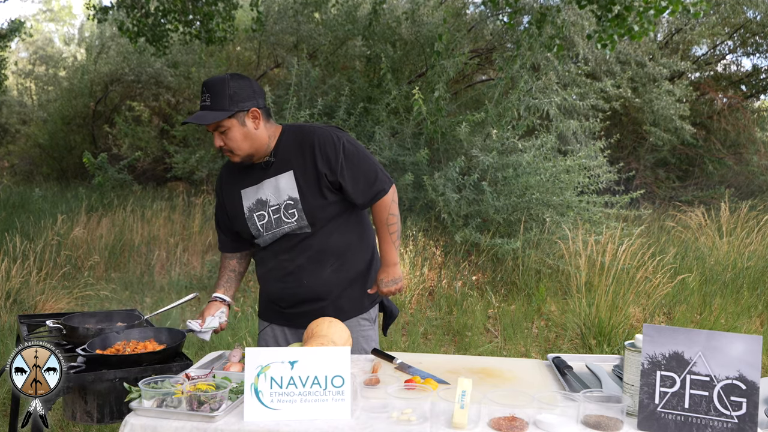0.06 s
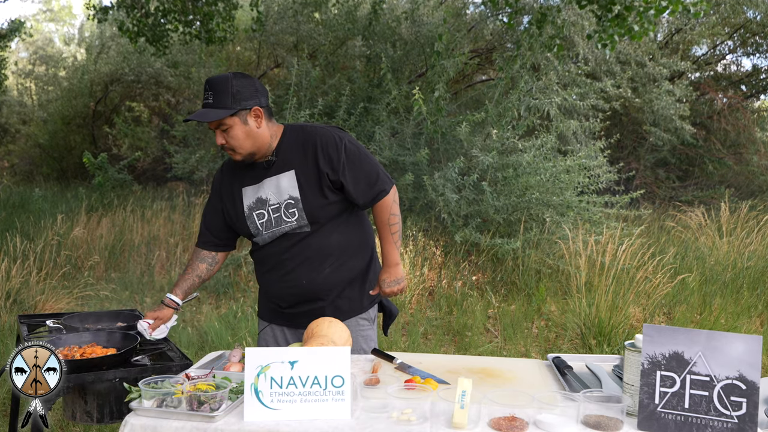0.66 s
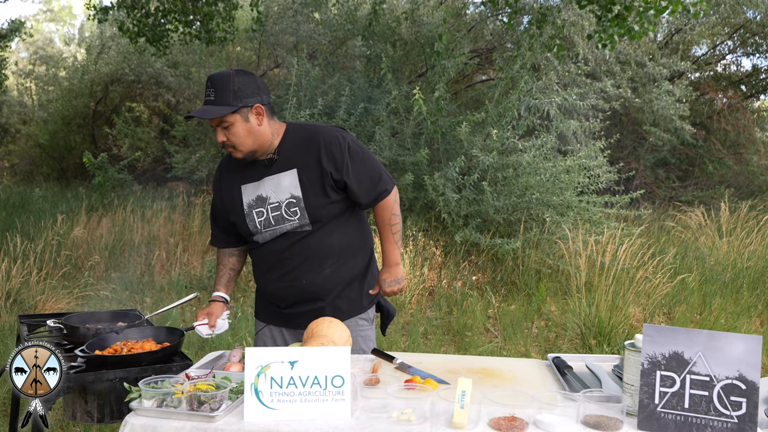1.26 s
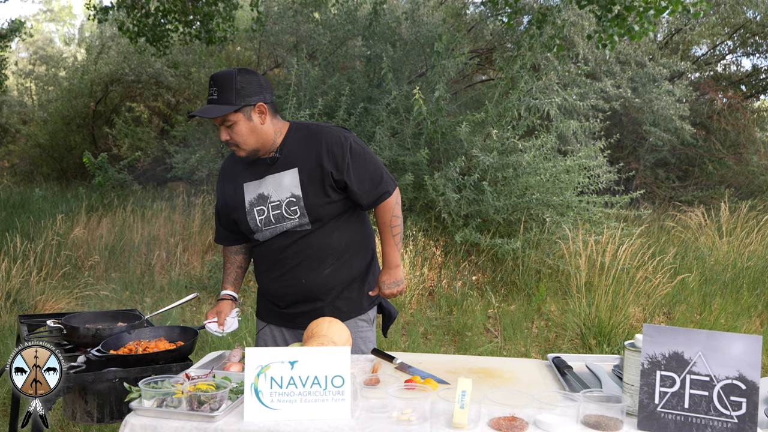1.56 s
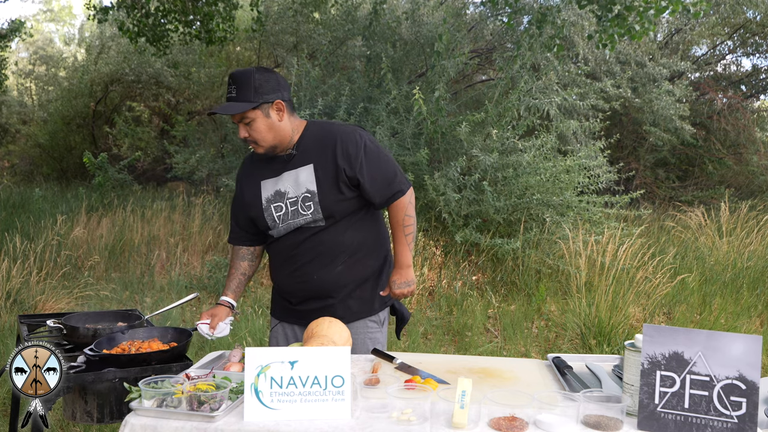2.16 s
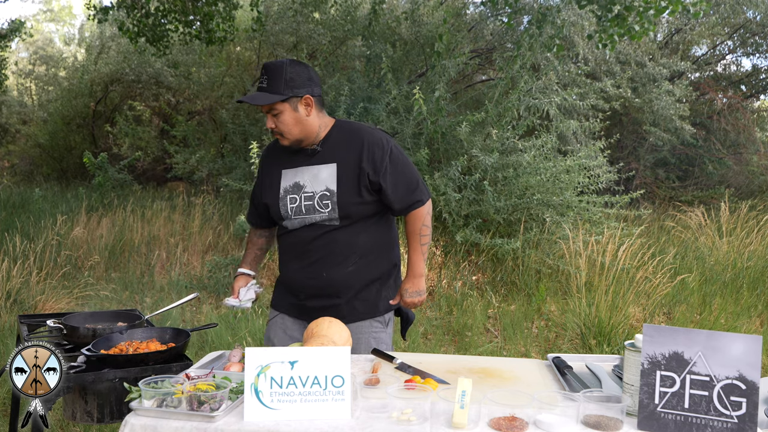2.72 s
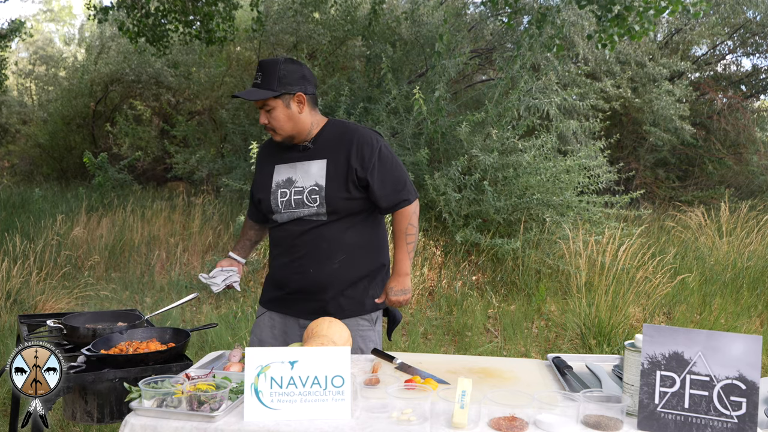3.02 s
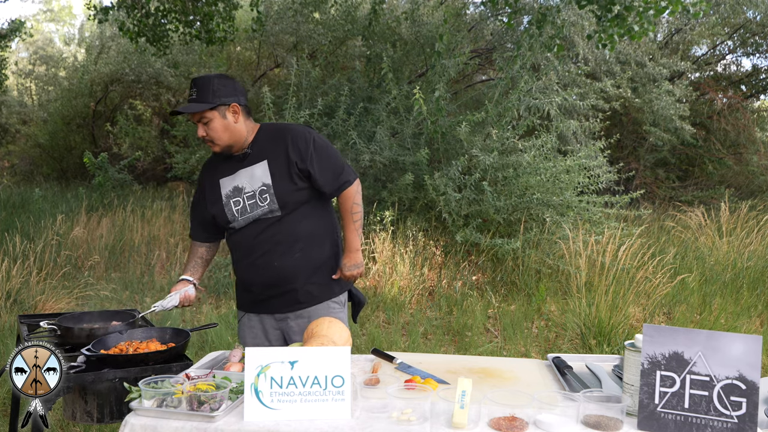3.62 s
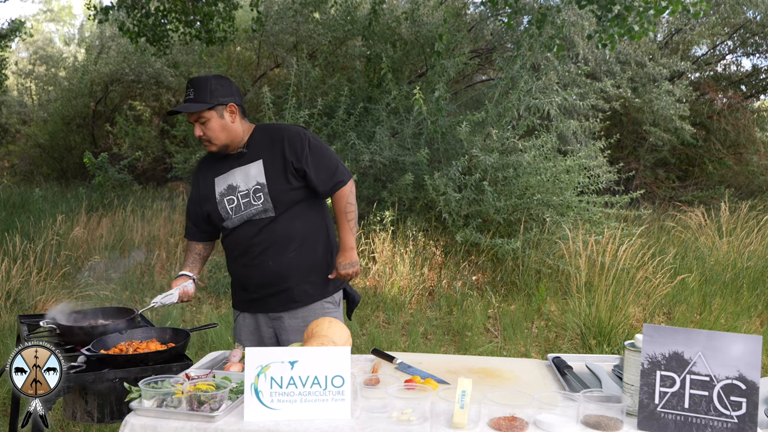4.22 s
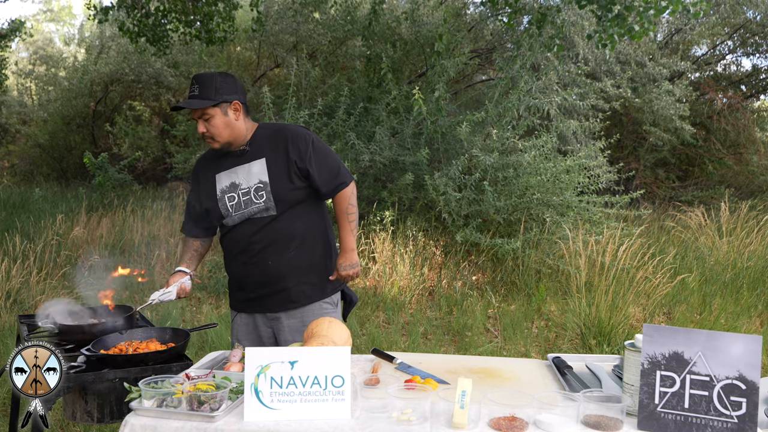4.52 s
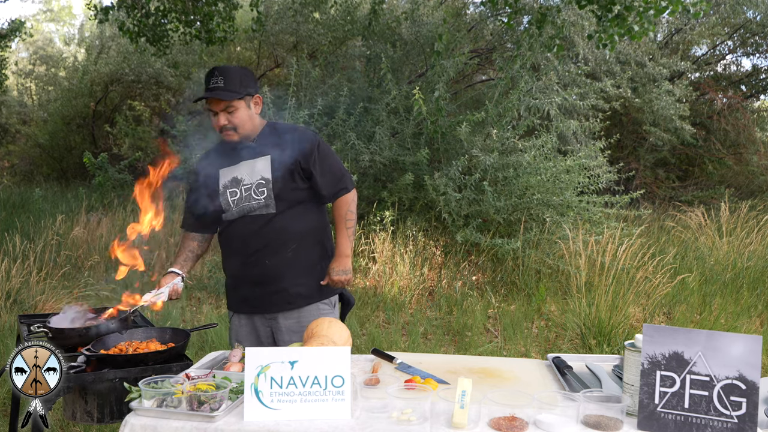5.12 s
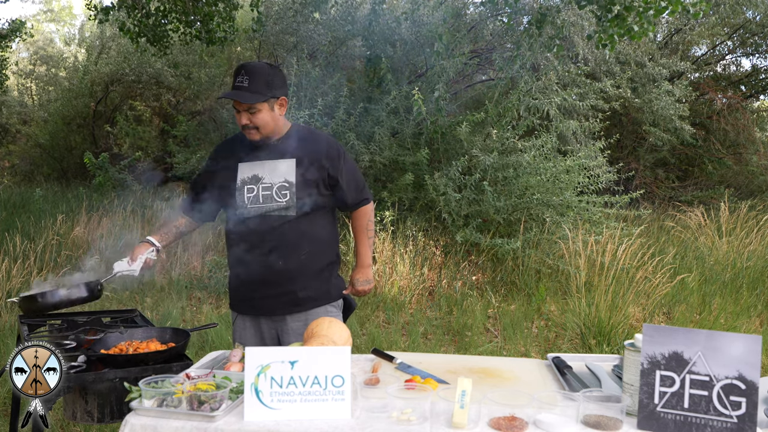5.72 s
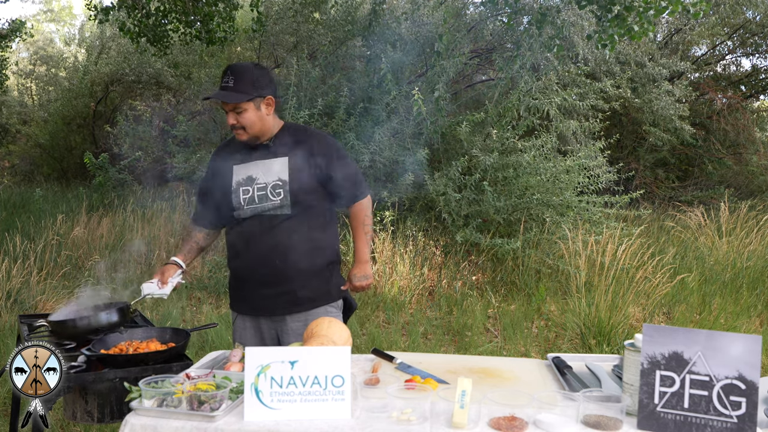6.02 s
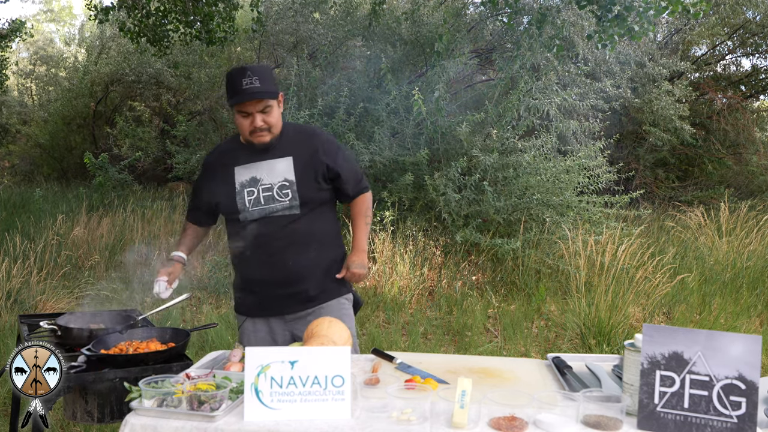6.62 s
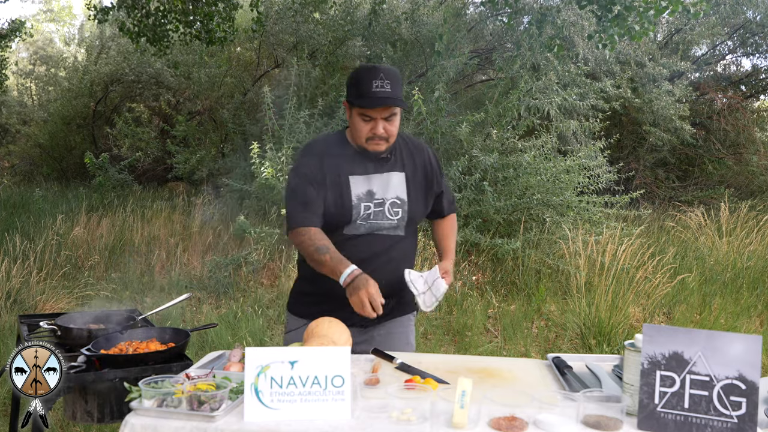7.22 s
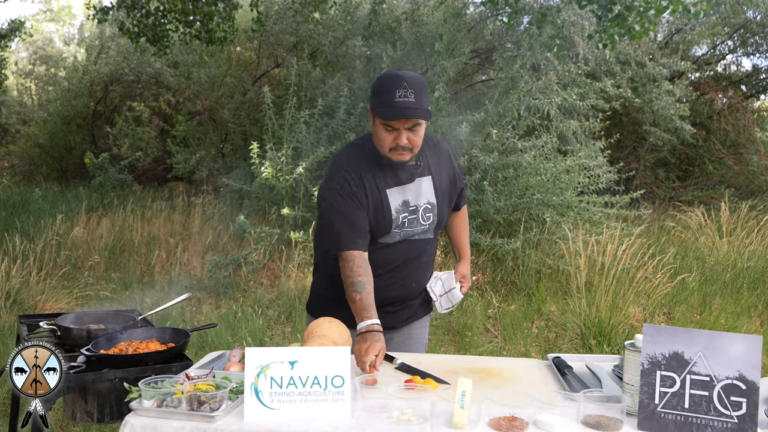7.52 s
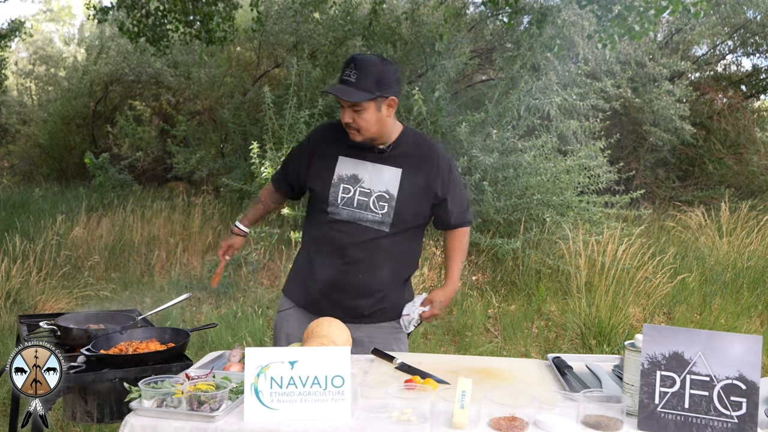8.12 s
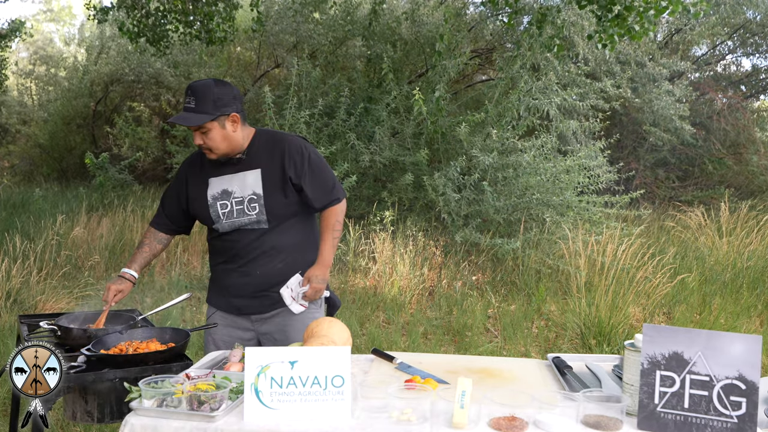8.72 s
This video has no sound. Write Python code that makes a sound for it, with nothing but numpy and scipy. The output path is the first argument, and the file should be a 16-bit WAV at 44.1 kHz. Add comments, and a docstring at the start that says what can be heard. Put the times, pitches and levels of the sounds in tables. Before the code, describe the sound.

Close, crackling frying runs over a faint rush of burners and open air. First a heavy skillet is shoved across a stove grate, ending in a bright clank. Midway another pan rattles and scrapes, the hiss swells and a low flare of fire flutters. After the pan knocks back down, the sizzling fades for a moment and returns as a wooden spoon taps the skillet once.

```python
"""Frying on a camp stove

Countless bursting bubbles make food sizzle in two pans, heard outdoors at the cook's chest. The sizzle
swells as food slides onto hot metal and sinks when the cook turns away. A cast-iron skillet is shoved
over the grate; a second pan is shaken, flares up and is set down. Each impact rings the metal's modes."""
import sys
import numpy as np
from scipy import signal
from scipy.fft import rfft, irfft
from scipy.io import wavfile
from scipy.ndimage import map_coordinates

SR = 44100
rng = np.random.default_rng(int(sys.argv[2]) if len(sys.argv) > 2 else 0)


def file_out(sig):
    """Save sig as 16-bit WAV at sys.argv[1]."""
    # one column per channel
    cols = np.atleast_2d(sig).T
    # limit, then scale
    lim = np.clip(cols, -1, 1)
    pcm = np.round(lim * 32767).astype(np.int16)
    wavfile.write(sys.argv[1], SR, pcm)


N = 386316
T = np.arange(N) / SR

# modes of the second pan: f/Hz, relative level/dB, t60/s
PAN_MODES = [(389.3, -8, 0.28), (440, -17, .08), (584, -4, 0.089), (649, -1.5, 0.057), (740, -8, 0.14),
             (882, -1.5, 0.071), (1054, -2, 0.1), (1178, 0.5, 0.11), (1432, 3.5, 0.075), (1520, -21, .1),
             (2207, -1.5, 0.11), (2200, -11, .08), (2800, -21, 0.083), (3620, 0, 0.064)]


def sizzle():
    """Three sizes of bubble sputter together; interference with a shifting echo comb-filters them."""
    # spectra of fizz, finest spray and coarse wet frying: f/Hz, relative level/dB
    fizz_shape = [(1200, -31.5), (2500, -11.5), (3600, -3.5), (5000, 1), (7000, 1.5), (9000, 0),
                  (11500, -10), (16000, -23)]
    spray_shape = [(5000, -23), (8000, -2.5), (10500, 3), (13000, 1.5), (16000, -4)]
    wet_shape = [(60, -30), (250, -16.5), (480, -13), (680, -7), (1100, -3), (1700, 1), (2300, 2.5),
                 (3200, 3), (4500, 2.5), (8000, -15)]
    fizz_db, spray_db, wet_db = frying_levels()
    sputter_db = 0.29 * walk(11) + 0.69 * walk(45) + 0.45 * walk(260)
    fizz = colour(bursts(per_s=5000, spread_db=3.5, steam_db=0), fizz_shape)
    fizz *= undb(fizz_db - 0.14 + 0.5 * walk(90))
    spray = colour(bursts(per_s=9000, spread_db=4, steam_db=0), spray_shape)
    spray *= undb(spray_db + 0.5 * walk(110))
    wet = colour(bursts(per_s=4000, spread_db=3, steam_db=-2.5), wet_shape) * undb(wet_db)
    direct = (fizz + spray + wet) * undb(sputter_db)
    lag_s = 0.001485 + 0.000306 * walk(1.2)  # the path via a nearby surface varies as the cook moves
    echo = map_coordinates(direct, [(T - lag_s) * SR], order=3)
    return direct + undb(-13) * signal.lfilter(*signal.butter(1, 6000, fs=SR), echo)


def frying_levels():
    """Incoherent sources add in power: steady frying plus surges, in dB for fizz, spray and wet frying."""
    # steady frying as the cook leans in, lifts a pan aside and turns away: t/s, level/dB
    frying = [(0.0, -32.5), (1.08, -27.5), (1.93, -27.5), (2.69, -34.5), (3.88, -22.5), (4.44, -27.5),
              (5.03, -36), (5.33, -34), (5.49, -43.4), (5.63, -40), (5.84, -28), (6.12, -25.5),
              (6.66, -23.5), (7.0, -35.5), (7.15, -48), (7.82, -48), (8.13, -35), (8.33, -35.5),
              (8.54, -22.5), (8.76, -21.0)]
    # food meets hot metal: t/s, hold/s, fizz level/dB, spray re fizz/dB, wet frying re fizz/dB
    surges = [(0.42, 0.34, -39, 5, -7), (1.368, 0.39, -28.5, 0, -11), (3.235, 0.12, -27.5, 1.5, -13),
              (3.895, 0.098, -21.8, -1, -5), (4.158, 0.065, -21, 1, -5), (4.548, 0.025, -20.5, -6, -7),
              (4.757, 0.092, -34.5, -4, -6), (5.122, 0.01, -20.5, -10, -9.5), (6.178, 0.11, -21, -2, -12),
              (6.381, 0.14, -22.5, -6.5, -2.5)]
    usual_db, wet_follows = -30, 0.7  # longer waves fade less when the cook turns away
    steady_db = np.interp(T, *np.transpose(frying))
    juice_db = 7 * swell(3.5, hold_s=0, attack_s=0.1, release_s=6.8)  # shaken-up juice boils off
    steady_wet_db = usual_db - 10 + wet_follows * (steady_db - usual_db) + juice_db
    power = undb([steady_db, steady_db - 1, steady_wet_db]) ** 2
    for s, hold_s, db, spray_db, wet_db in surges:
        surge = swell(s, hold_s, attack_s=0.087, release_s=0.063)
        power += np.outer(undb([db, db + spray_db, db + wet_db]), surge) ** 2
    return 10 * np.log10(power)


def bursts(per_s, spread_db, steam_db):
    """Shot noise: tiny bubbles burst at random, a few far louder than the rest, over even steam hiss."""
    sizes = undb(spread_db * np.minimum(rng.exponential(size=N), 6))
    clicks = (rng.random(N) < per_s / SR) * sizes * rng.choice([-1, 1], N)
    return unit(clicks) + undb(steam_db) * rng.standard_normal(N)


def turn_away(hiss):
    """Spectral coloration: peaks and dips make the hiss hollow while the cook is turned away."""
    # hollow colour: f/Hz, relative level/dB
    ripple = [(1400, -0.5), (1750, 1.5), (2000, 0.5), (2450, -1.5), (2650, 1), (2900, -2), (3270, 2.5),
              (3680, -3), (4150, 1), (4700, -1), (7000, 0.5), (10000, 1.5)]
    away = swell(6.65, hold_s=1.56, attack_s=0.17, release_s=0.17)
    return (1 - away) * hiss + away * np.std(hiss) * colour(hiss, ripple)


def spits(decay_s=0.00062):
    """A bursting droplet of fat is a damped transient, a snap a few cycles long."""
    # the loudest droplets: t/s, level/dB, f/Hz
    droplets = [(.391, -19.5, 2230), (.58, -18, 4970), (1.614, -16, 3800), (2.3205, -16, 6000),
                (2.628, -24.5, 4020), (2.7252, -19, 6050), (2.892, -22, 9000), (3.3564, -10.5, 11200),
                (4.186, -18, 7000), (5.0797, -19, 9000)]
    out, t = np.zeros(N), T[:512]
    for s, db, hz in droplets:
        band = [(hz / 40, -40), (hz / 10, -20), (hz / 2, -4), (hz, 0), (hz * 2, -8)]
        snap = 1.1 * colour(rng.standard_normal(len(t)), band)
        tone = 1.4 * np.sin(2 * np.pi * hz * t)
        add(out, s, undb(db) * np.exp(-t / decay_s) * (tone + snap))
    return out


def skillet():
    """Impacts set the cast iron into free vibration as it is shoved over the grate."""
    # skillet modes: f/Hz, relative level/dB, t60/s
    modes = [(194.3, -15.5, .25), (395, -8, 0.22), (516, -1, 0.2), (638, -5, 0.13), (705, -0.5, 0.18),
             (877, -3, 0.1), (953, 0, 0.29), (1500, -0.5, 0.14), (1650, -12, 0.24), (1854, -8.5, 0.44),
             (2206, -2, 0.2), (2312, -22, 0.27), (2640, -4, 0.093), (3120, -6, 0.4), (3380, -4, .16),
             (4100, -22, 0.89), (4960, -12, 0.16)]
    # shoves: t/s, ring/dB, favoured f/Hz, thud/dB, clash/dB, rattle/s (levels relative)
    hits = [(.178, -29, 2300, -42, -18, .008), (.224, -21.5, 840, -38, -21, .005),
            (.256, -26.5, 1480, -25.5, -39, .003), (.286, -24.5, 1610, -28, -40, 0.033),
            (.453, -28, 950, -33, -20.5, .006), (.457, -29, 1870, -44, -33, .008),
            (.479, -31, 199, -30, -21, .02), (.64, -27.5, 990, -27, -20, 0.012),
            (.72, -23, 752, -26.5, -21, 0.011), (.724, -26, 4900, -46, -36, .006),
            (.742, -24, 953, -34, -36, 0.011), (.904, -36, 1010, -33, -28, .007),
            (1.058, -36, 700, -30.5, -40, 0.023), (1.09, -26.5, 800, -29, -43, .025),
            (1.118, -30, 1450, -28.5, -42, 0.027), (1.415, -27, 2200, -23.5, -17, .012),
            (1.428, -29, 527, -35, -26, 0.01)]
    return undb(-3.5) * impacts(hits, modes, focus_db=18, focus_octaves=0.099, top_hz=4640,
                                thud_t60=0.25, clash_t60=0.11, rattle_db=-10.5)


def pan():
    """The second pan, shaken and set down, rings in more heavily damped modes."""
    # knocks: t/s, ring/dB, favoured f/Hz, thud/dB, clash/dB, rattle/s (levels relative)
    hits = [(3.164, -38.5, 750, -54, -55, .003), (3.314, -40, 1000, -52, -48, .002),
            (3.341, -24, 647, -52, -52, .002), (3.47, -27.5, 563, -54, -42, .007),
            (3.588, -19.5, 1380, -25.5, -14, .006), (3.736, -16, 580, -22.5, -19, .005),
            (3.772, -23, 3500, -29, -15, 0.0098), (3.797, -27, 1450, -28, -33, .02),
            (3.844, -33, 1200, -29, -25, .003), (3.864, -19.5, 1460, -30, -14, .005),
            (3.994, -18, 576, -32, -20, 0.0066), (4.051, -18, 3500, -28, -15.5, .008),
            (4.104, -18, 1470, -29, -18, .008), (4.124, -24, 594, -24.5, -28, 0.022),
            (4.232, -22.5, 590, -25, -35, .005), (4.294, -15, 710, -24.5, -20, .003),
            (4.375, -17.5, 3400, -32, -32, .02), (4.478, -26, 740, -26.5, -40, .014),
            (4.561, -13.5, 680, -29, -23, .003), (4.844, -20, 600, -30, -40, .004),
            (6.0345, -15, 654, -24.5, -17, .003), (6.05, -29.5, 390, -40, -42, 0.011),
            (6.06, -28, 1110, -41, -40, .01), (6.094, -19.5, 644, -29.5, -42, .002),
            (6.203, -35, 714, -40, -40, .003), (6.424, -26, 650, -32, -46, .003),
            (6.444, -27, 726, -28.5, -24, .009), (6.473, -34, 680, -32, -26, 0.018)]
    return undb(-2) * impacts(hits, PAN_MODES, focus_db=17, focus_octaves=0.31, top_hz=3400,
                              thud_t60=0.23, clash_t60=0.047, rattle_db=-15.5)


def grate():
    """The struck grate clanks at its high natural frequencies."""
    # grate modes: f/Hz, relative level/dB, t60/s
    modes = [(1073, -5, 0.065), (1204, -8.5, 0.14), (1260, -6, 0.18), (2440, -22, 0.081), (2960, 2, 0.063),
             (3080, -2, 0.19), (3580, 0, 0.074), (3340, 3, 0.091), (3780, 0, 0.11), (3840, -5, 0.18),
             (3920, -1, 0.22), (4760, -8, 0.18), (5930, -1, 0.19), (5980, -4, 0.21), (6300, -13, .09),
             (6500, -4.5, 0.099), (6730, -2, 0.084), (7070, -11, .09), (7540, 3.5, 0.056), (8300, 3, .07),
             (9200, 2, .13)]
    # clanks: t/s, ring/dB, favoured f/Hz, thud/dB, clash/dB, rattle/s
    hits = [(.179, -23, 5970, -34.5, -16.5, .006), (.2825, -22, 7700, -58, -33, .001),
            (1.243, -12.5, 6660, -37, -19, .002), (1.248, -16, 6500, -52, -21.5, .004),
            (1.251, -18, 1117, -31.5, -37, 0.021)]
    return impacts(hits, modes, focus_db=17.5, focus_octaves=0.12, top_hz=7500,
                   thud_t60=0.38, clash_t60=0.11, rattle_db=-17)


def impacts(hits, modes, focus_db, focus_octaves, top_hz, thud_t60, clash_t60, rattle_db):
    """Modal superposition: each contact and its three rebounds ring the body and shake the stove."""
    # dense ring of the sheet-metal stove: f/Hz, relative level/dB
    stove_shape = [(40, -54), (95, -0.5), (150, -2.5), (260, -4.5), (400, 0), (700, 3), (1000, -2),
                   (1800, -5), (4000, -17.5)]
    out, t = np.zeros(N), T[:SR // 2]
    hz, mode_db, t60 = np.transpose(modes)
    for s, ring_db, favoured_hz, thud_db, clash_db, rattle_s in hits:
        lags = rattle_s * np.r_[0, np.arange(3) / 2 + rng.uniform(0.25, 0.7, size=3)]
        energy = undb(2 * rattle_db * lags / rattle_s)
        since = t - lags[:, None]

        def fade(t60_s):
            """The energies of the contacts add and decay exponentially."""
            decays = (since >= 0) * np.exp(-2 * np.log(1000) * np.abs(since) / t60_s)
            return np.sqrt(energy @ decays)

        # the place and hardness of the contact pick out the modes near one pitch
        nearness = np.exp(-(np.log2(hz / favoured_hz) / focus_octaves) ** 2)
        gains = undb(mode_db + focus_db * nearness + rng.standard_normal(len(hz)))
        phases = 2 * np.pi * (hz[:, None] * t + rng.random((len(hz), 1)))
        ring = sum(gain * np.sin(phase) * fade(decay) for gain, phase, decay in zip(gains, phases, t60))
        ring /= np.sqrt(np.sum(gains ** 2) / 2)
        thud = colour(rng.standard_normal(len(t)), stove_shape) * fade(thud_t60)
        clash = overtones(len(t), top_hz) * fade(clash_t60)
        add(out, s, undb(ring_db) * ring + undb(thud_db) * thud + undb(clash_db) * clash)
    return out


def overtones(length, top_hz, count=100):
    """Crowded partials of metal; the contact's softness acts as a low-pass filter above top_hz."""
    # dense ring of the contact: f/Hz, relative level/dB
    clash_shape = [(60, -30), (600, -18), (1400, -2), (2200, 4.5), (3600, 4), (5000, 6.5), (7500, 10),
                   (11000, -14), (16000, -24)]
    lines = np.zeros(length // 2 + 1, complex)
    bins = ((np.arange(count) + rng.random(count)) / count * (len(lines) - 1)).astype(int)
    lines[bins] = rng.uniform(0.19, 1, count) * np.exp(2j * np.pi * rng.random(count))
    partials = unit(irfft(lines, length))
    metal = colour(partials + 0.5 * rng.standard_normal(length), clash_shape)
    return colour(metal, [(top_hz, 0), (2 * top_hz, -19)])


def scrape(s=3.82, half_length_s=0.35, db=-38, per_s=140):
    """The shaken pan skips over the grate: tiny contacts are convolved with its impulse response."""
    t = T[:SR // 4]
    response = sum(undb(mode_db) * hz * np.sin(2 * np.pi * hz * t) * np.exp(-np.log(1000) * t / t60)
                   for hz, mode_db, t60 in PAN_MODES if hz < 2500)
    contacts = (rng.random(N) < per_s / SR) * rng.standard_normal(N)
    shake = np.exp(-((T - s) / half_length_s) ** 4)
    return undb(db) * shake * unit(signal.fftconvolve(contacts, response)[:N])


def spoon(s=8.6725, db=-19, decay_s=0.00033):
    """Heavy damping leaves one thin, dry tick as a wooden spoon meets the skillet."""
    out, t = np.zeros(N), T[:256]
    wood = sum(gain * np.cos(2 * np.pi * hz * t) for hz, gain in [(2700, 1), (4200, 0.57), (1400, 0.24)])
    tick = signal.lfilter(*signal.butter(2, 800, "high", fs=SR), wood * np.exp(-t / decay_s))
    add(out, s, undb(db) * unit(tick))
    return out


def rubs(width=0.059):
    """Friction of iron sliding on the grate drives a narrow resonance into a faint hum."""
    # slides: centre t/s, half-length/s, f/Hz, level/dB
    slides = [(1.77, 0.27, 910, -52.5), (2.11, 0.092, 525, -46), (2.09, 0.16, 436, -53),
              (3.945, 0.098, 1204, -39)]
    out = np.zeros(N)
    for s, half_length_s, hz, db in slides:
        band = [(hz / 10, -70), (hz / 2, -40), (hz * (1 - width), -12), (hz, 0),
                (hz * (1 + width), -12), (hz * 2, -40), (hz * 10, -70)]
        out += colour(rng.standard_normal(N), band) * undb(db) * np.exp(-((T - s) / half_length_s) ** 2)
    return out


def flames():
    """Combustion noise: burning oil mist roars and flutters."""
    # spectrum of the roar: f/Hz, relative level/dB
    roar_shape = [(25, -39), (60, -6), (130, 5.5), (240, 2), (420, 4.5), (700, 4), (1300, -0.5),
                  (3000, -17)]
    # a low fire round the shaken pan, then one tall flare: t/s, hold/s, level/dB
    flares = [(3.466, 1.54, -41.5), (4.643, 0.14, -35.5)]
    roar = colour(bursts(per_s=1500, spread_db=2, steam_db=3), roar_shape)
    power = sum((undb(db) * swell(s, hold_s, attack_s=0.078, release_s=0.11)) ** 2
                for s, hold_s, db in flares)
    return roar * np.sqrt(power) * undb(2 * walk(30))


def air(rush_db=-46):
    """Broadband noise of burners and open air, with low pressure bumps on the microphone."""
    # spectrum of the surroundings: f/Hz, relative level/dB
    rush_shape = [(20, -15), (50, -4), (125, 2), (230, -4.5), (330, 0.5), (440, -2.5), (650, 1.5),
                  (1100, -2.5), (1400, -2.5), (1700, -2.5), (2500, -12.5), (8000, -12), (16000, -18)]
    # soft bumps of air: centre t/s, level/dB, half-length/s
    bumps = [(2.8, -55, 0.34), (3.01, -50, 0.027), (3.166, -41, 0.027), (3.309, -41, 0.018),
             (5.03, -48, 0.12), (8.65, -52, 0.091)]
    rumble_shape = [(15, -16), (40, 1.5), (75, 0.5), (130, -8), (300, -35), (2000, -80)]
    rush = colour(rng.standard_normal(N), rush_shape) * undb(rush_db + 0.089 * walk(6))
    rumble = colour(rng.standard_normal(N), rumble_shape)
    return rush + rumble * sum(undb(db) * np.exp(-((T - s) / half_s) ** 2) for s, db, half_s in bumps)


def swell(s, hold_s, attack_s, release_s):
    """An envelope with a linear rise, a hold and an exponential decay."""
    rise = np.clip((T - s) / attack_s, 0, 1)
    return rise * np.exp(-np.maximum(T - s - attack_s - hold_s, 0) / release_s)


def walk(rate):
    """Random modulation at rms 1, interpolated between `rate` new values a second."""
    return unit(map_coordinates(rng.standard_normal(4096), [T * rate], order=1, mode="wrap"))


def colour(x, points):
    """Filter by a curve of (f/Hz, level/dB) points, then scale to rms 1."""
    hz, db = np.transpose(points)
    f = np.maximum(np.fft.rfftfreq(len(x), 1 / SR), 1)
    gain = undb(np.interp(np.log(f), np.log(hz), db))
    return unit(irfft(rfft(x) * gain, len(x)))


def undb(db):
    """Decibels to amplitude ratio."""
    return 10 ** (np.asarray(db) / 20)


def unit(x):
    """Scale to rms 1."""
    return x / np.sqrt(np.mean(x ** 2) + 1e-18)


def add(track, s, sound):
    """Superpose a sound on the track from s seconds on."""
    i = max(int(s * SR), 0)
    track[i:i + len(sound)] += sound[:N - i]


def scene():
    """All sources superpose at one microphone, the same in both channels."""
    clatter = skillet() + pan() + grate() + scrape() + spoon() + rubs()
    mono = turn_away(sizzle()) + spits() + clatter + flames() + air()
    return np.array([mono, mono])


def record(dry):
    """Soft saturation rounds the tallest peaks; a steep low-pass filter limits the bandwidth."""
    top_hz = 15850
    return signal.sosfilt(signal.ellip(12, 0.1, 80, top_hz, fs=SR, output="sos"), np.tanh(dry))


dry = scene()
out = record(dry)
file_out(out)
```